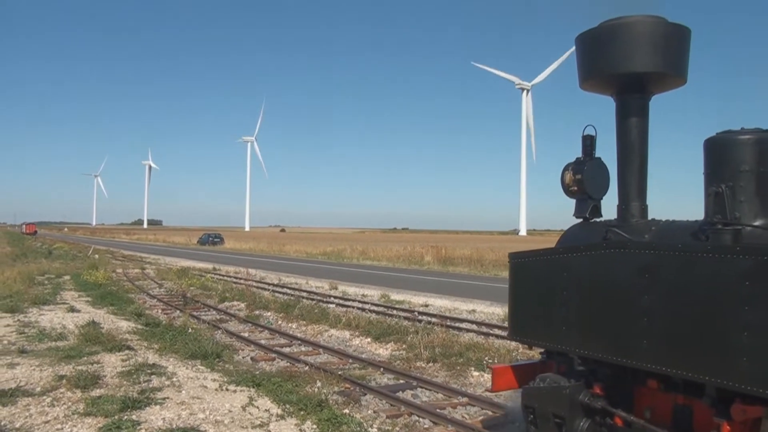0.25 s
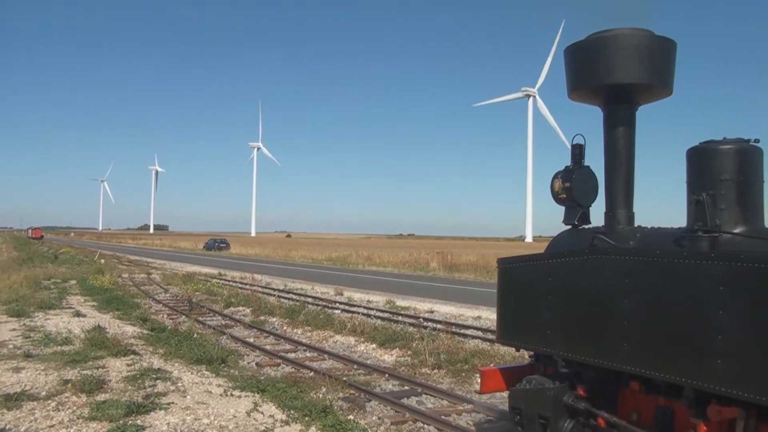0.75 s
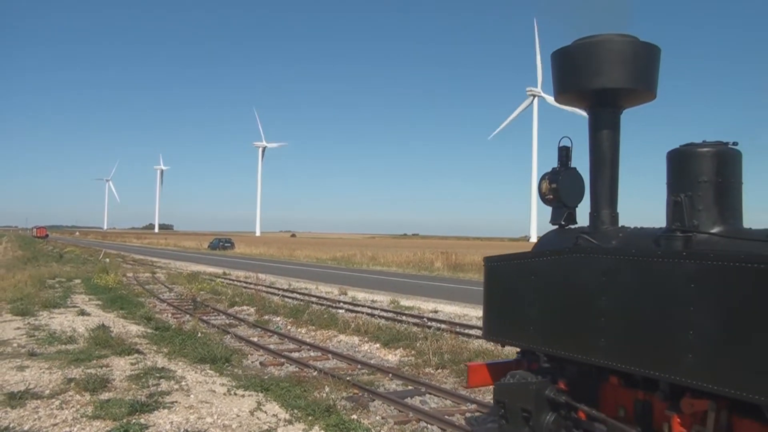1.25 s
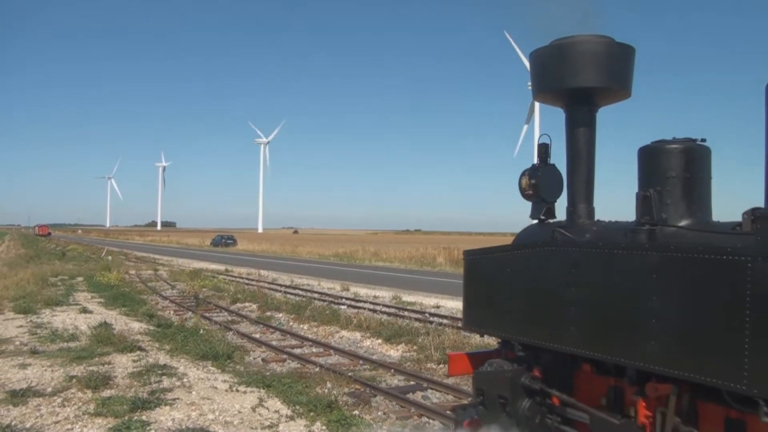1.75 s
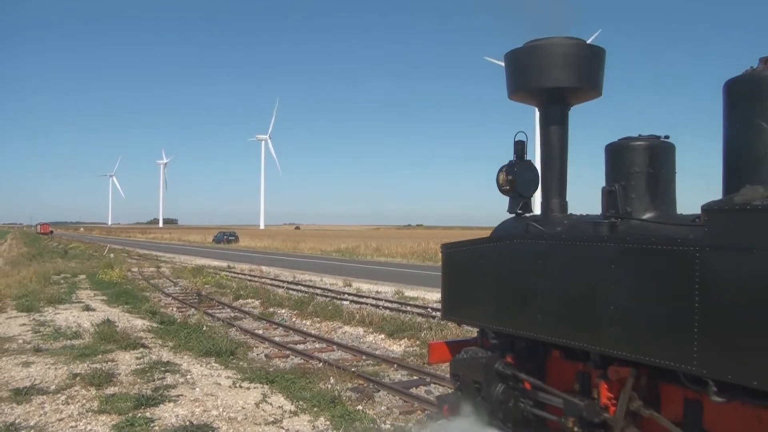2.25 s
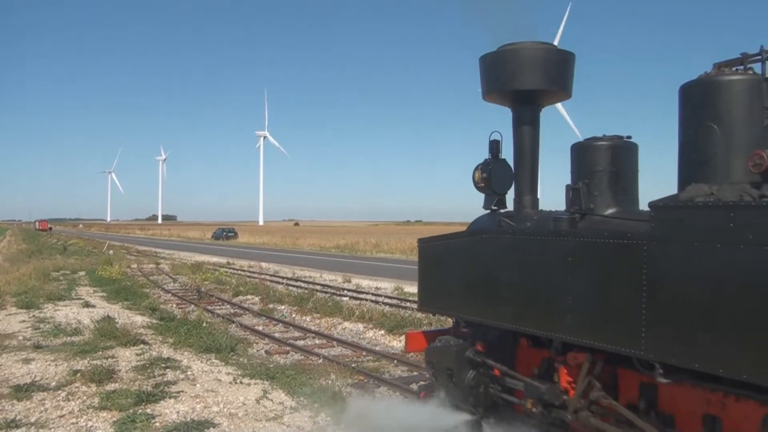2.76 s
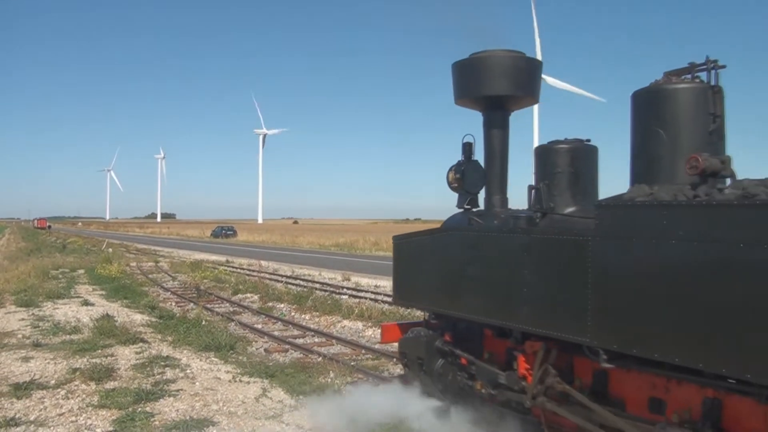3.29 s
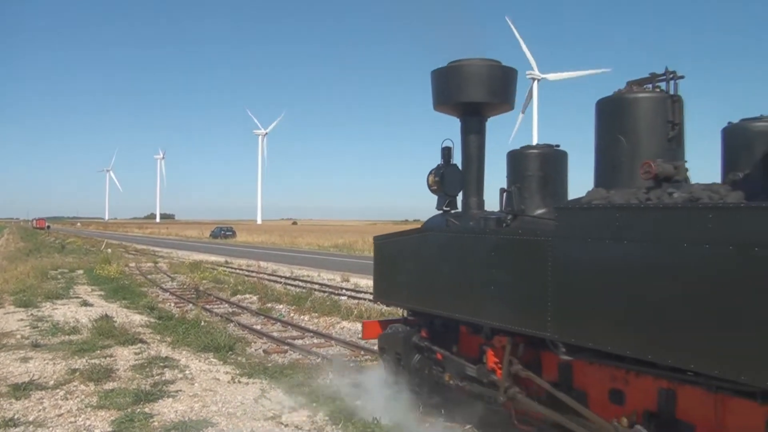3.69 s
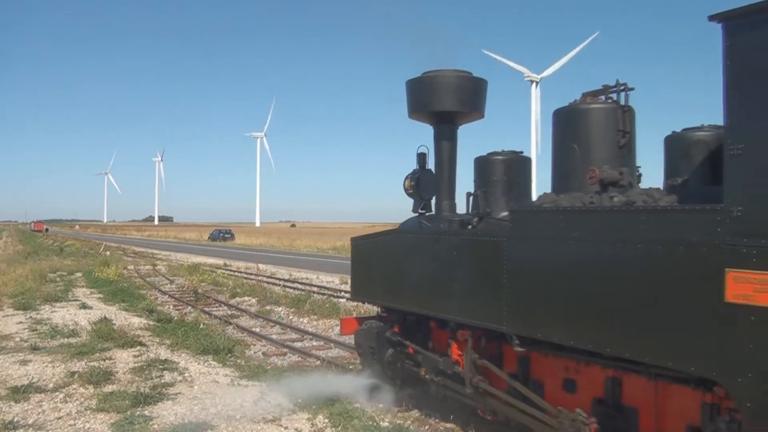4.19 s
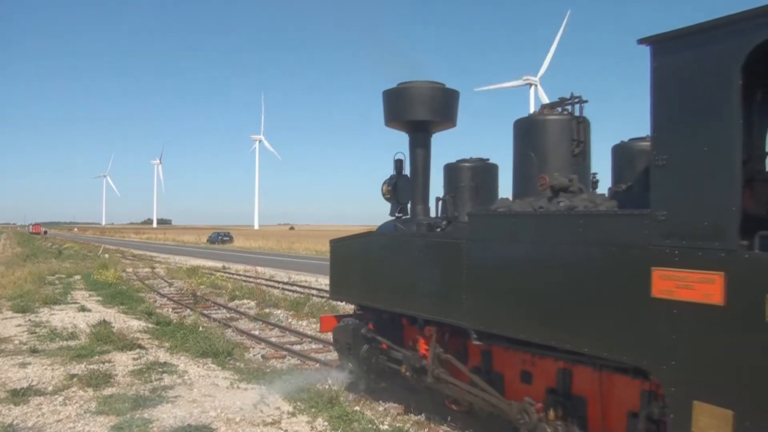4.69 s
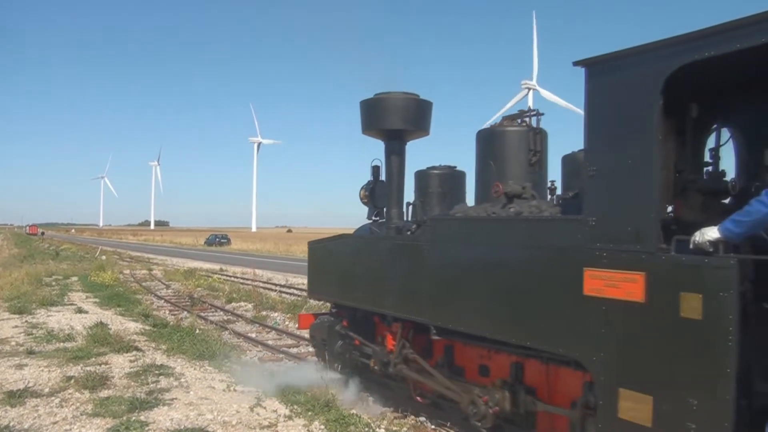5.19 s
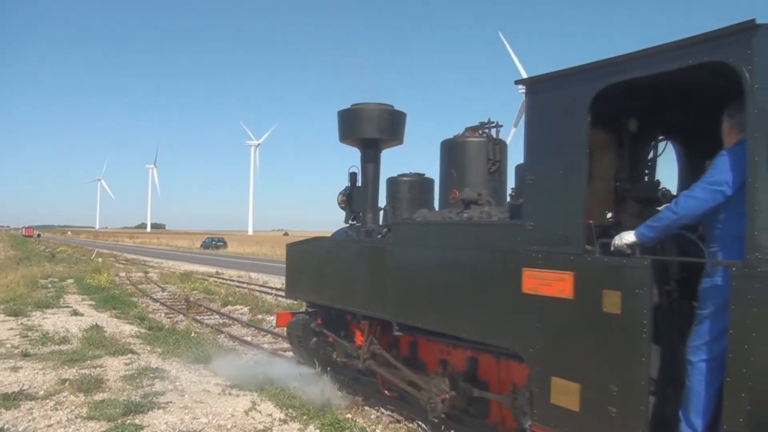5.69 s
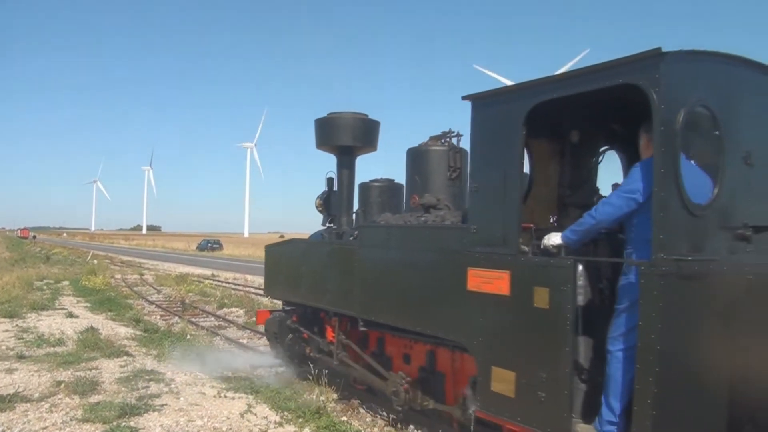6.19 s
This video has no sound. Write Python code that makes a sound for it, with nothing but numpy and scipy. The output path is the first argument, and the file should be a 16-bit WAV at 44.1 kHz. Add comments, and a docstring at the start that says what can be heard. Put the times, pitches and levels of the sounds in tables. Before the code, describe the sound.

Loud wet jets of steam hiss and fade in slow strokes as a small steam engine rolls by, clanking once, then knocking and rumbling.

```python
"""Wet steam hisses from the open drain cocks of a small steam locomotive creeping past in open country.
Each slow piston stroke blows a jet of coloured noise that starts wet and sags at the end of the stroke.
Filtered noise makes the wheels' grinding and rumble, which grow as the cab draws level, and a brief groan.
Ringing modes make the knocks of the frame and the clank of the coupling.
Soft puffs of noise from the chimney mark the ends of the strokes."""
import sys
import numpy as np
from scipy import signal
from scipy.fft import rfft, irfft
from scipy.io import wavfile
from scipy.ndimage import uniform_filter1d

SR = 44100
rng = np.random.default_rng(int(sys.argv[2]) if len(sys.argv) > 2 else 0)


def store_pcm(level_fs):
    """Save levels as 16-bit WAV."""
    pcm = np.round(np.clip(level_fs, -1, 1) * 32767).astype(np.int16)
    wavfile.write(sys.argv[1], SR, np.atleast_2d(pcm).T)


N = 284445
T = np.arange(N) / SR  # time of every sample [s]
FREQS = np.maximum(np.arange(N // 2 + 1) * SR / N, 1)  # [Hz], kept above zero for the logarithms
TOP_HZ = 15850  # highest pitch that is heard


def undb(db):
    """Turn decibels into a gain."""
    return 10 ** (np.asarray(db) / 20)


def unit(x):
    """Scale to an rms of 1."""
    return x / np.sqrt(np.mean(x ** 2))


def curves(table):
    """Draw straight lines between the rows: one value per sample for each column."""
    times, *columns = np.transpose(table)
    return [np.interp(T, times, column) for column in columns]


def colour(points):
    """Gain at every frequency, from (frequency [Hz], level [dB]) points."""
    hz, db = np.transpose(points)
    return undb(np.interp(np.log(FREQS), np.log(hz), db))


def random_spectrum():
    """Random strength and phase at every frequency: the spectrum of white noise."""
    return rng.standard_normal(2 * len(FREQS)).view(complex)


def walk(rate_hz):
    """Smooth random wandering up to about a given rate, with a spread of 1."""
    slow_enough = 1 / (1 + (FREQS / rate_hz) ** 4)
    no_drift = FREQS / (FREQS + rate_hz / 4)
    return unit(irfft(random_spectrum() * slow_enough * no_drift, N))


def swells(table):
    """Puffs that swell up to their moment and then die away."""
    total = 0
    for moment, db, rise, decay in table:
        before = np.minimum(T - moment, 0)
        after = np.maximum(T - moment, 0)
        total = total + undb(db) * np.exp(-(before / rise) ** 2 - after / decay)
    return total


def spells(table):
    """Smooth passing bumps, from (time [s], height, half length [s]) rows."""
    return sum(height * np.exp(-np.minimum(((T - moment) / length) ** 2, 20))
               for moment, height, length in table)


# Stereo width, side relative to middle: (frequency [Hz], level [dB])
STEREO_WIDTH = [(30, -15), (140, -8), (300, -10), (700, -10), (1290, -17), (2380, -15), (4400, -12),
                (8120, -19), (15000, -25)]


def noise(gain):
    """Stereo turbulence of a given colour, with an rms of 1 in the middle."""
    mid = irfft(random_spectrum() * gain, N)
    side = irfft(random_spectrum() * gain * colour(STEREO_WIDTH), N)
    return np.array([mid + side, mid - side]) / np.std(mid)


def widen(x):
    """Scatter from the ground and the engine's flank reaches the two ears differently."""
    scatter = rng.standard_normal(SR // 50)
    side = signal.fftconvolve(x, scatter / np.linalg.norm(scatter))[:N]
    side = irfft(rfft(side) * colour(STEREO_WIDTH), N)
    return np.array([x + side, x - side])


# Piston strokes, each blowing through a cock: (port opens [s], rise [s], steam cut off [s],
# sag as the steam expands [dB/s], exhaust opens [s], level when dry [dB], gush when dry and strong [dB],
# sizzle when dry and strong [dB])
PISTON_STROKES = [(-0.17, 0.21, 1.93, 43, 2.16, -18.5, -5.5, -5.5),
                  (2.345, 0.029, 3.33, 38, 3.68, -17.5, -7.5, -7.2),
                  (3.84, 0.21, 4.766, 75, 4.86, -17.5, -10.5, -7),
                  (4.962, 0.033, 5.73, 38, 5.98, -16.5, -9, -9),
                  (6.03, 0.19, 6.59, 40, 6.78, -18, -9.5, -6)]
# Steam leaking on between strokes, changing as the cocks come nearer: (time [s], level when dry [dB])
STEAM_LEAK = [(2.3, -39), (3.75, -33.6), (4.9, -31.5), (6.05, -33)]
# Spells in which the steam runs wet in mid-stroke: (time [s], wetness [0-1], half length [s])
WET_STEAM = [(0.053, .85, .05), (0.633, 0.2, 0.031), (0.85, 0.7, 0.066), (3.035, 0.66, .05),
             (3.37, 0.46, 0.14), (4.595, .3, 0.055), (5.223, 0.8, 0.055), (5.6, .7, 0.022)]
OPENING_DB = 19  # climb of the jet as the port opens
EXHAUST_DB_PER_S = 163  # extra collapse once the exhaust opens
FLUSH_S = 0.23  # half length of the wet start, as gathered water is blown out
WET_LEVEL_DB, WET_GUSH_DB, WET_SIZZLE_DB = -2, 5, -4  # change at a wetness of 1
SLACK_GUSH, SLACK_SIZZLE = 0.36, 0.21  # dB of gush gained and of sizzle lost per dB that the jet sags
SILENT_DB = -120


def cylinder_flow():
    """Level, gush and sizzle in dB: each stroke opens, holds, sags and collapses, and starts wet."""
    opens, *_, gush, sizzle = np.transpose(PISTON_STROKES)
    power = undb(curves(STEAM_LEAK)[0]) ** 2
    wet = spells(WET_STEAM)
    for start, rise, cut_off, sag, exhaust, db, *_ in PISTON_STROKES:
        opening = np.minimum((T - start) / rise - 1, 0)  # -1 as the port opens, 0 when fully open
        expansion_db = sag * np.maximum(T - cut_off, 0)
        exhaust_db = EXHAUST_DB_PER_S * np.maximum(T - exhaust, 0)
        stroke_db = db + OPENING_DB * opening - expansion_db - exhaust_db
        power = power + undb(np.maximum(stroke_db, SILENT_DB)) ** 2
        wet = wet + np.maximum(1 + opening, 0) * spells([(start, 1, FLUSH_S)])
    level_db = 10 * np.log10(power)
    slack_db = level_db.max() - level_db
    # the tone passes smoothly from each stroke to the next
    stroke = np.maximum(np.searchsorted(opens, T) - 1, 0)
    gush_db = uniform_filter1d(gush[stroke], size=SR // 20)
    sizzle_db = uniform_filter1d(sizzle[stroke], size=SR // 20)
    return (level_db + WET_LEVEL_DB * wet,
            gush_db + WET_GUSH_DB * wet + SLACK_GUSH * slack_db,
            sizzle_db + WET_SIZZLE_DB * wet - SLACK_SIZZLE * slack_db)


def jet_colours(body, pipe):
    """Colour of one jet early and late in its approach; so small a nozzle radiates no deep bass."""
    ripple_db = 0
    for hz, width, *early_and_late_db in pipe:
        bump = np.exp(-(2 * (FREQS - hz) / width) ** 2)
        ripple_db = ripple_db + np.outer(early_and_late_db, bump)
    return list(colour(body) * undb(ripple_db) / np.hypot(1, 140 / FREQS))


def chokes(per_s, length_s, depth_db):
    """Drops of water block the nozzle for an instant, at random: brief dips in dB about a mean of 0."""
    drops = (rng.random(N) < per_s / SR) * rng.uniform(0.63, 1, N)
    dips = np.minimum(signal.fftconvolve(drops, np.hanning(int(length_s * SR)), "same"), 1)
    return -depth_db * (dips - dips.mean())


# Broad colour of the near jet, and of the jet that takes over: (frequency [Hz], level [dB])
NEAR_JET = [(150, -31), (700, -31), (1200, -22.5), (2500, -10), (5500, -9.5), (9000, 1.8), (12500, -8),
            (16000, -11.5)]
NEXT_JET = [(150, -37), (700, -33), (1200, -22), (2500, -20), (5500, -9), (9000, -4), (12500, -8.5),
            (16000, -12)]
# Peaks and notches that the drain pipe and the ground put on each jet:
# (frequency [Hz], width [Hz], level early in its approach [dB], level late [dB])
NEAR_PIPE = [(1015, 140, 3, 5), (1767, 200, 1, -9), (2260, 430, -8, -7.5), (2780, 290, 1, -0.5),
             (3105, 220, -5, -4), (3530, 630, 0.5, 3.5), (4620, 570, -4.5, -3), (5200, 450, 4, 1.5),
             (6270, 1020, 5.5, 5), (7320, 330, -3.5, -3), (9300, 730, 1, -1), (10160, 630, -1, 3.5),
             (10910, 340, -2, -0.5), (11500, 420, 5.5, -3), (13400, 960, 4.0, 1)]
NEXT_PIPE = [(877, 400, 11, 8), (2686, 860, 8.5, 8), (3235, 190, -1, -8), (3950, 1930, 6, 8),
             (4690, 470, -7, -2.5), (5260, 580, -1.5, 6.5), (5840, 520, -3.5, 1.5), (6540, 440, 1.5, 6),
             (6880, 470, -0.5, -4), (8020, 1270, 4.5, 5.5), (9180, 1100, 1.5, 5), (10300, 1000, 5, 5.5),
             (11260, 440, 4.5, 3.5), (12670, 660, -6, -2), (13320, 690, -1, -7)]
# The jets turn and hand over: (time [s], stage [0, 1: near jet early, late; 2, 3: next jet early, late])
JET_STAGE = [(0.9, 0), (2.3, 1), (3.72, 1), (3.84, 2), (4.7, 2), (5.25, 3)]
# Larger drops that block the nozzle: (time [s], dip [dB], half length [s])
NOZZLE_BLOCKAGES = [(1.555, 3, 0.014), (4.093, 3.5, .007), (4.21, 3.5, 0.0073), (5.86, 3, 0.031)]
# Slugs of condensed water blown out with the steam: (time [s], level [dB], rise [s], decay [s])
WATER_SLUGS = [(0.04, -21.5, 0.11, 0.07), (0.85, -37, 0.03, .04), (1.58, -33, 0.033, 0.06),
               (1.82, -37, 0.17, .06), (2.40, -30, 0.04, 0.08), (3.87, -38, 0.02, 0.19),
               (5.04, -34.5, 0.035, 0.12)]
# Colour of the slugs: (frequency [Hz], level [dB])
WATER_COLOUR = [(40, -36), (200, -1), (600, -5.5), (1100, 0), (2000, -3), (3500, 0.5), (6000, 2.5),
                (10000, -11)]


def drain_cocks(sputter_db, choke_db):
    """Steam jets: water thickens the low gush, chokes the fine sizzle in quick fits, and comes in slugs."""
    level_db, gush_db, sizzle_db = cylinder_flow()
    stage, = curves(JET_STAGE)
    shapes = jet_colours(NEAR_JET, NEAR_PIPE) + jet_colours(NEXT_JET, NEXT_PIPE)

    def eddies(share):
        """Turbulence of the jets in one range of eddy sizes, blended from stage to stage."""
        total = 0
        for k, shape in enumerate(shapes):
            blend = np.sqrt(np.maximum(1 - abs(stage - k), 0))
            total = total + noise(shape * np.sqrt(share)) * blend
        return total

    # large eddies make the gush, the finest make the sizzle, the core of the jet lies between
    large = 1 / (1 + (FREQS / 6700) ** 16)
    fine = 1 / (1 + (11800 / FREQS) ** 20)
    water = walk(rate_hz=11)
    gush_db = gush_db + 0.01 + sputter_db * water + 0.58 * walk(rate_hz=88)
    sizzle_db = sizzle_db + 1.0 - choke_db * water + 0.85 * walk(rate_hz=83)
    gush = eddies(large) * undb(gush_db)
    core = eddies((1 - large) * (1 - fine)) * undb(0.46 * walk(rate_hz=25))
    sizzle = eddies(fine * (FREQS < TOP_HZ)) * undb(sizzle_db)
    slugs = noise(colour(WATER_COLOUR)) * swells(WATER_SLUGS) * undb(2.7 * walk(rate_hz=89))
    flow_db = level_db + chokes(per_s=2, length_s=0.014, depth_db=2.5) - spells(NOZZLE_BLOCKAGES)
    return (gush + core + sizzle) * undb(flow_db) + slugs


# Rolling of the wheels, before the boosts below: (time [s], grinding level [dB], deep rumble level [dB])
WHEEL_ROLL = [(0.0, -46, -48), (0.12, -51, -54), (0.57, -56.5, -63), (1.38, -57, -71), (1.67, -48.5, -60.5),
              (1.98, -50, -57), (2.35, -47, -56), (2.82, -51, -58.5), (3.3, -48.5, -54),
              (4.13, -43.5, -54.5), (4.58, -46, -46), (4.76, -40.5, -39), (5.55, -44, -43),
              (5.84, -40, -44), (5.98, -39.5, -45.5), (6.45, -39, -48)]
GRIND_BOOST_DB, RUMBLE_BOOST_DB = 3, 2.5
# Colours of the grinding and of the rumble: (frequency [Hz], level [dB])
GRIND_COLOUR = [(120, -7), (200, -0.5), (300, 1.5), (380, -2.5), (500, -5), (630, -14.5), (1100, -10),
                (2500, -18.5)]
RUMBLE_COLOUR = [(18, -24), (30, -11), (50, -3), (90, -1.5), (130, -0.5), (200, -7.5), (400, -42)]
# The wheels drop into hollows of the track: (time [s], level [dB], rise [s], decay [s])
TRACK_JOLTS = [(0.07, -39, 0.087, .035), (0.47, -50, .05, .04), (2.70, -42, 0.033, .035),
               (4.31, -42, .03, .05), (4.78, -41, .04, .05)]


def wheels():
    """Wheels grind unevenly over rough rail, with a deep rumble under them that swells at each jolt."""
    roll_db, deep_db = curves(WHEEL_ROLL)
    grind_db = roll_db + GRIND_BOOST_DB + 2.5 * walk(rate_hz=11.6)
    rumble_db = deep_db + RUMBLE_BOOST_DB + 1.5 * walk(rate_hz=9)
    bass_cut = 1 / (1 + (110 / FREQS) ** 4)
    grind = noise(colour(GRIND_COLOUR) * bass_cut) * undb(grind_db)
    rumble = noise(colour(RUMBLE_COLOUR)) * np.hypot(undb(rumble_db), swells(TRACK_JOLTS))
    return grind + rumble


CLATTER_PER_S, CLATTER_HZ = 10, 500  # how often on average; hardness as cut-off
CLATTER_DB, CLATTER_SPREAD_DB = 6, 2  # peak above the grinding level in WHEEL_ROLL; spread either way


def clatter():
    """Lesser knocks at random, stronger as the wheels grind louder: (time [s], level [dB], cut-off [Hz])."""
    roll_db, _ = curves(WHEEL_ROLL)
    moments = np.flatnonzero(rng.random(N) < CLATTER_PER_S / SR)
    level_db = roll_db + CLATTER_DB + CLATTER_SPREAD_DB * rng.uniform(-1, 1, N)
    return [(T[i], level_db[i], CLATTER_HZ) for i in moments]


def strike(blows, modes, rattle, rattle_s):
    """Blows ring a set of modes; a softer contact is duller, and loose parts rattle just after."""
    t = T[:SR // 3]
    ring = 0
    for hz, db, t60 in modes:
        ring = ring + undb(db) * np.cos(2 * np.pi * hz * t) * np.exp(-np.log(1000) * t / t60)
    out = np.zeros(N + len(t))
    for moment, db, hard_hz in blows:
        push = rattle * rng.standard_normal(len(t)) * np.exp(-t / rattle_s)
        push[0] += 1  # the blow itself
        softness = signal.butter(2, min(hard_hz, SR / 3), fs=SR, output="sos")
        hit = signal.sosfilt(softness, signal.fftconvolve(push, ring)[:len(t)])
        start = max(int(moment * SR), 0)
        out[start:start + len(t)] += undb(db) * hit / np.abs(hit).max()
    return out[:N]


# Knocks of rods and wheels in the frame: (time [s], peak level [dB], hardness as cut-off [Hz])
FRAME_KNOCKS = [(0.053, -17, 600), (0.835, -29, 650), (2.195, -27, 900), (3.70, -25.5, 510),
                (4.585, -23.5, 200), (4.608, -20.5, 450), (4.70, -25, 500), (4.762, -23, 250),
                (4.797, -24.5, 193), (4.89, -23, 350), (5.055, -26, 200), (5.166, -23, 300),
                (5.21, -24, 300), (5.99, -17, 850), (6.085, -19, 160), (6.294, -27, 399), (6.39, -24, 350),
                (6.425, -20, 600)]
# Ringing modes of the frame: (frequency [Hz], level [dB], time to fall 60 dB [s])
FRAME_MODES = [(130, -10, .09), (201, -2, 0.092), (253, -4.5, 0.12), (294.5, -1, 0.087), (347, -2.5, 0.061),
               (445, -5, 0.054), (620, -10, 0.026), (804, -3, 0.068), (1090, -12, .05), (1500, -14, .03),
               (2000, -12, .02)]
# A slack coupling snaps taut and rebounds: (time [s], peak level [dB], hardness as cut-off [Hz])
COUPLING_CLANKS = [(0.0644, -6.5, 3000), (0.0705, -12, 2200)]
# Ringing modes of the coupling: (frequency [Hz], level [dB], time to fall 60 dB [s])
COUPLING_MODES = [(940, -15, 0.035), (1100, -12, .02), (1334, -6, 0.044), (1570, 5, 0.016),
                  (1690, -5, 0.051), (1780, 0, .016), (1880, -8, 0.014)]
# The frame groans under load: (time [s], level [dB], rise [s], decay [s])
FRAME_GROANS = [(3.60, -35.5, 0.02, .08)]
GROAN_HZ, GROAN_WIDTH_HZ = 303, 65


def running_gear():
    """The coupling clanks, and the frame knocks as ringing metal and groans as a narrow band of noise."""
    knocks = strike(FRAME_KNOCKS + clatter(), FRAME_MODES, rattle=0.04, rattle_s=0.019)
    clanks = strike(COUPLING_CLANKS, COUPLING_MODES, rattle=0.3, rattle_s=0.002)
    groan_colour = 1 / (1 + (2 * (FREQS - GROAN_HZ) / GROAN_WIDTH_HZ) ** 2)
    groan = noise(groan_colour) * swells(FRAME_GROANS)
    return groan + widen(knocks + clanks)


# Exhaust beats from the chimney: (time [s], level [dB], rise [s], decay [s])
EXHAUST_BEATS = [(2.175, -32.5, 0.036, 0.049), (3.68, -34, 0.071, 0.032), (4.85, -35, 0.04, 0.05),
                 (5.99, -37, 0.055, 0.02), (6.42, -38, 0.12, .06)]
# Colour of the beats: (frequency [Hz], level [dB])
EXHAUST_COLOUR = [(100, -19), (300, 2), (620, -13), (1050, 0), (1500, -1.5), (2000, -1.5), (2600, -7),
                  (6000, -26)]


def chimney():
    """Soft exhaust beats: puffs of noise, muffled by the spark arrester."""
    return noise(colour(EXHAUST_COLOUR)) * swells(EXHAUST_BEATS) * undb(0.83 * walk(rate_hz=60))


def scene():
    """The whole locomotive, with no walls near enough to echo."""
    return drain_cocks(sputter_db=0.66, choke_db=0.9) + wheels() + running_gear() + chimney()


def record(dry):
    """Cut the treble steeply above TOP_HZ."""
    return signal.sosfilt(signal.ellip(12, 0.1, 80, TOP_HZ, fs=SR, output="sos"), dry)


dry = scene()
out = record(dry)
store_pcm(out)
```